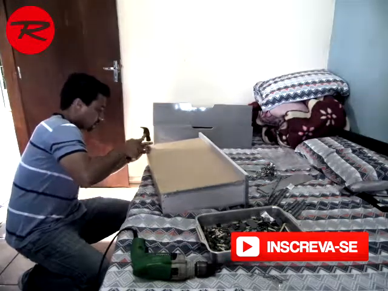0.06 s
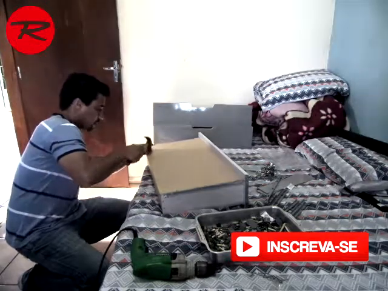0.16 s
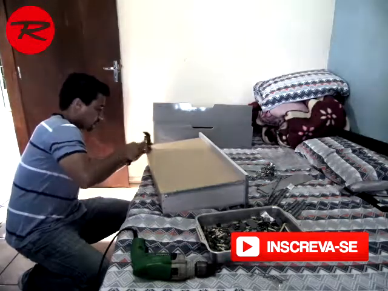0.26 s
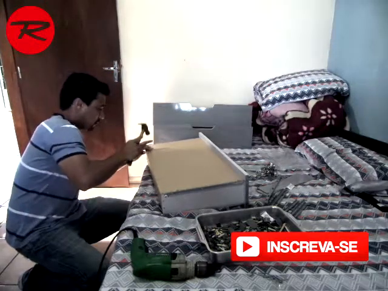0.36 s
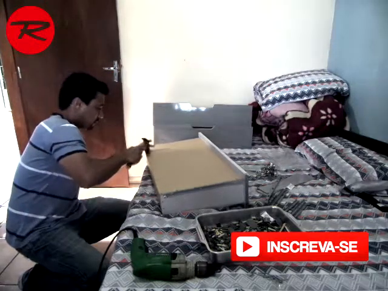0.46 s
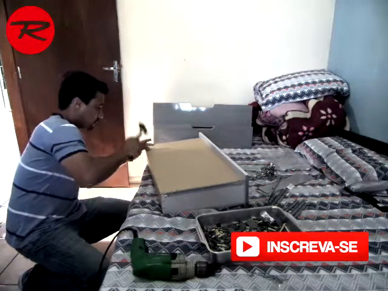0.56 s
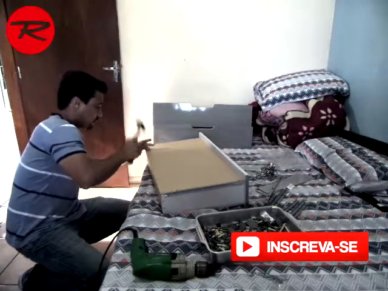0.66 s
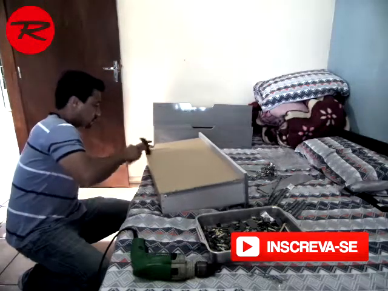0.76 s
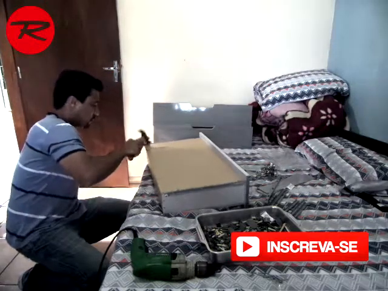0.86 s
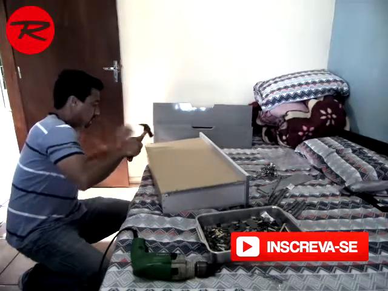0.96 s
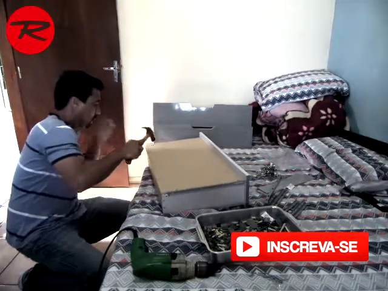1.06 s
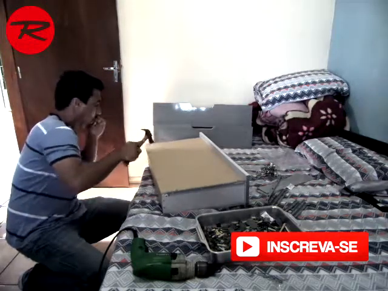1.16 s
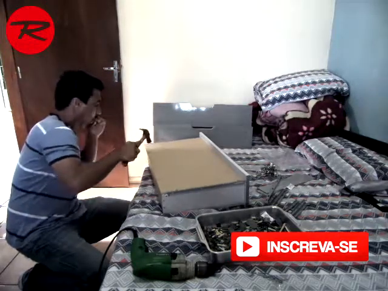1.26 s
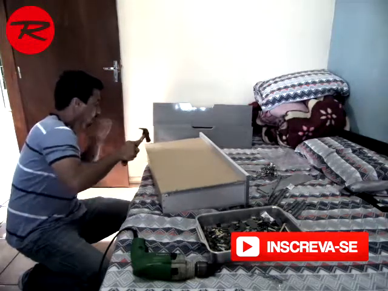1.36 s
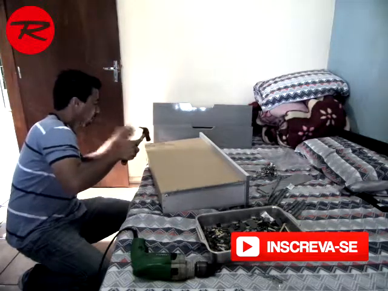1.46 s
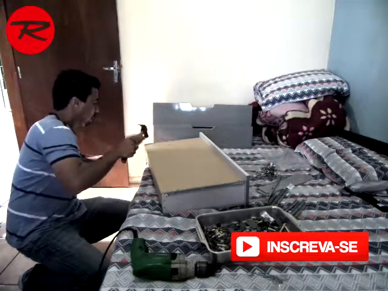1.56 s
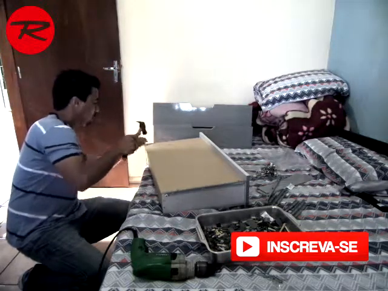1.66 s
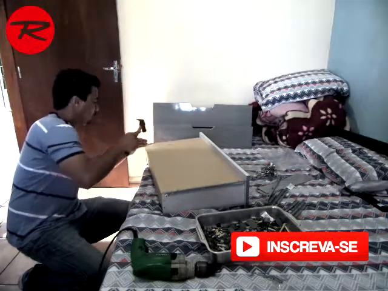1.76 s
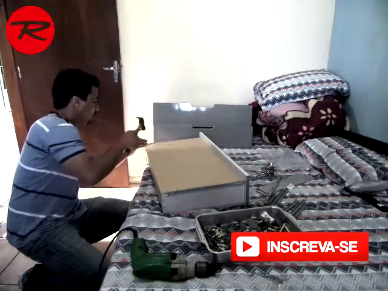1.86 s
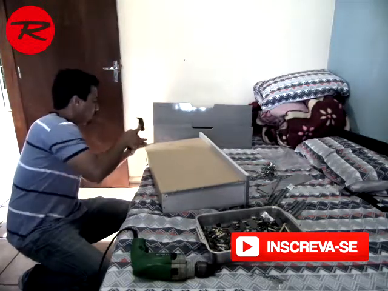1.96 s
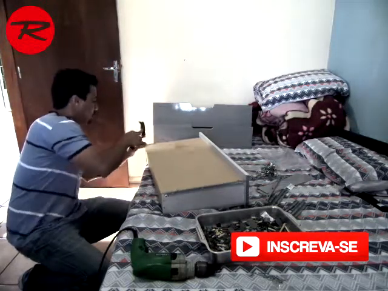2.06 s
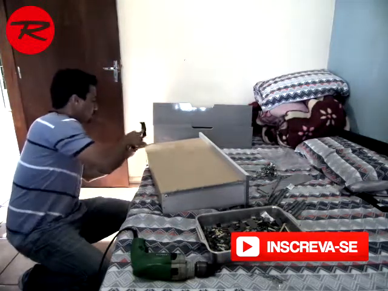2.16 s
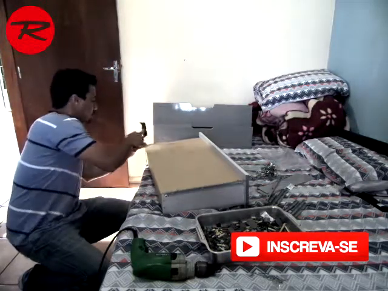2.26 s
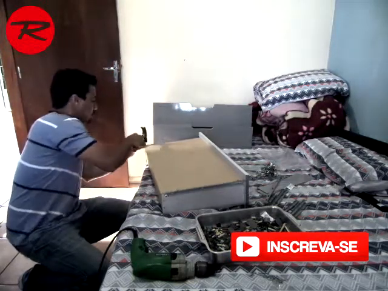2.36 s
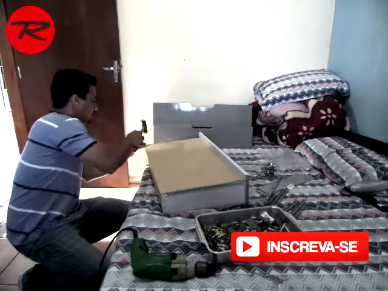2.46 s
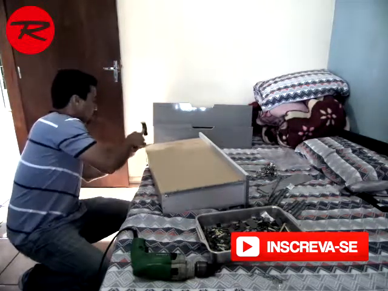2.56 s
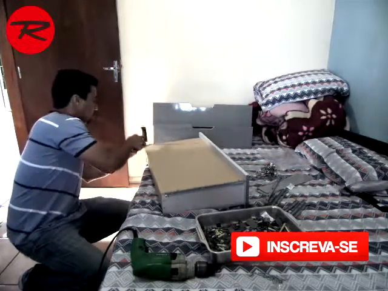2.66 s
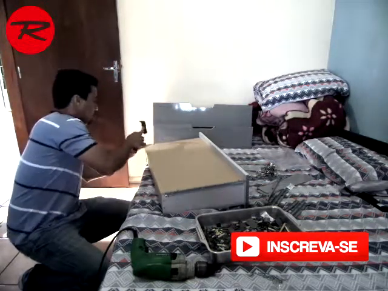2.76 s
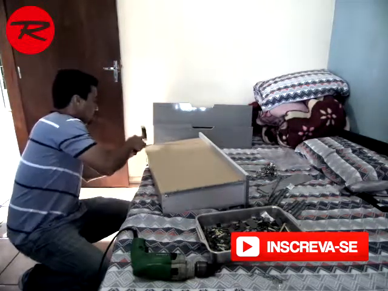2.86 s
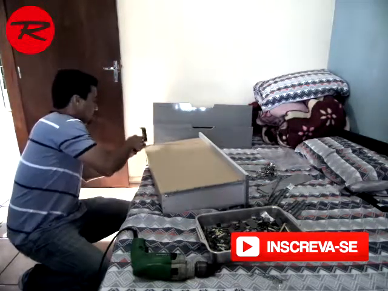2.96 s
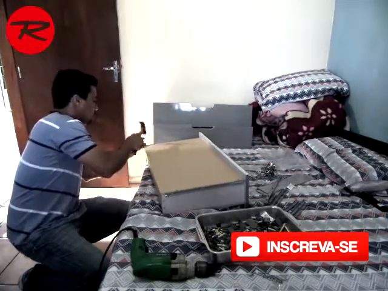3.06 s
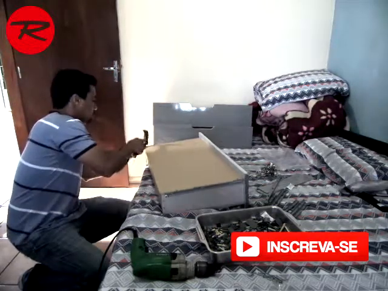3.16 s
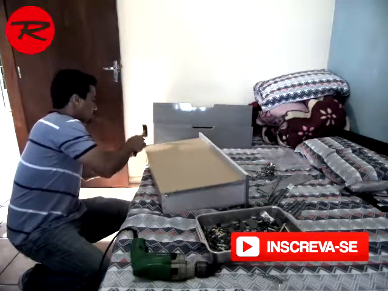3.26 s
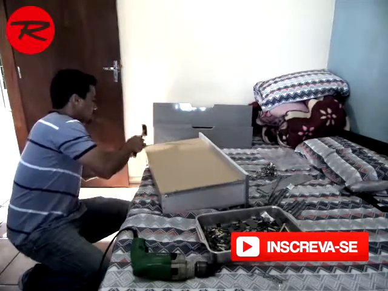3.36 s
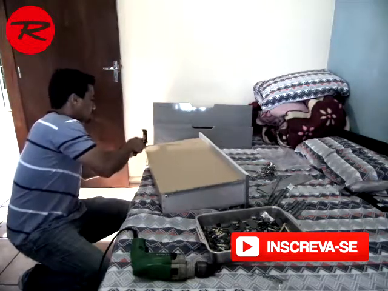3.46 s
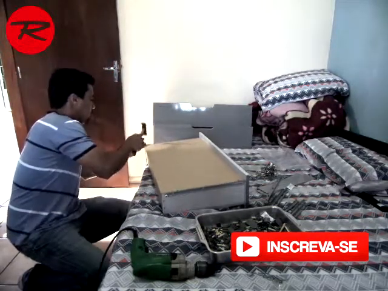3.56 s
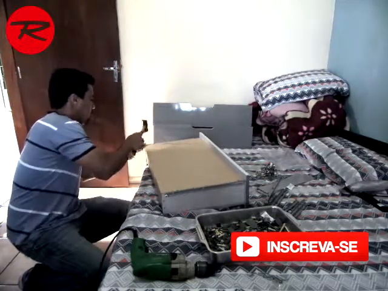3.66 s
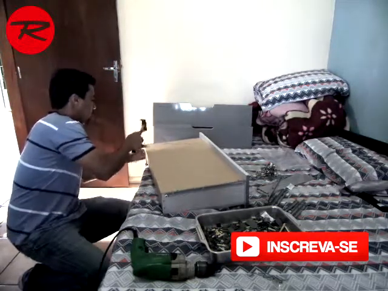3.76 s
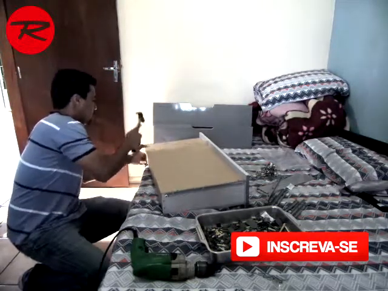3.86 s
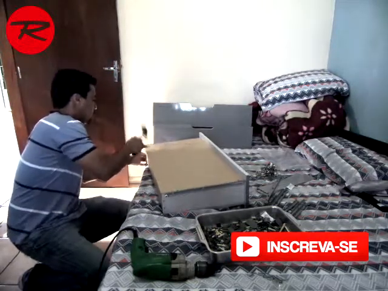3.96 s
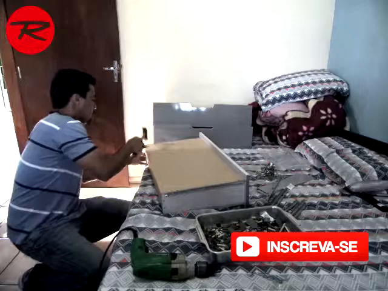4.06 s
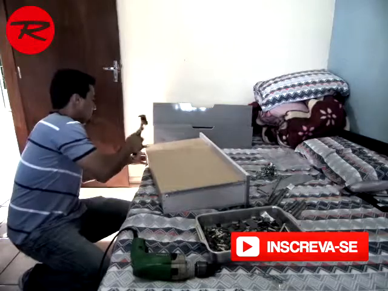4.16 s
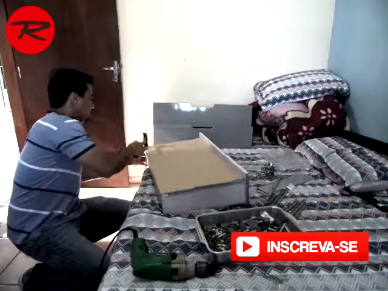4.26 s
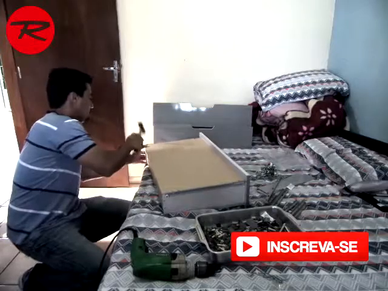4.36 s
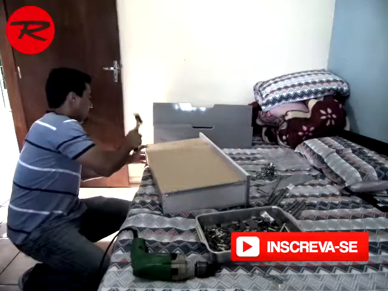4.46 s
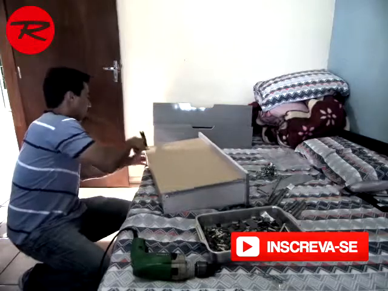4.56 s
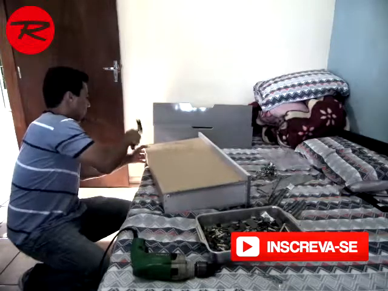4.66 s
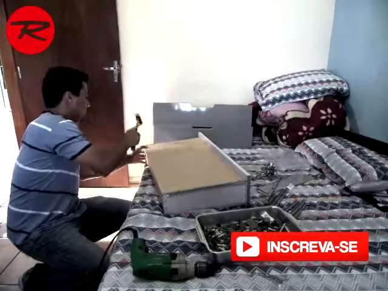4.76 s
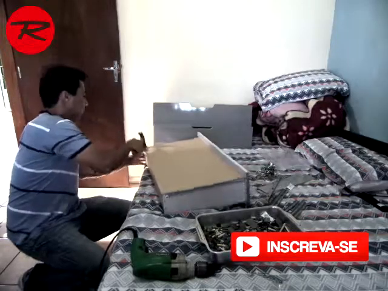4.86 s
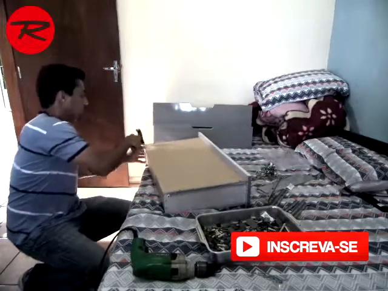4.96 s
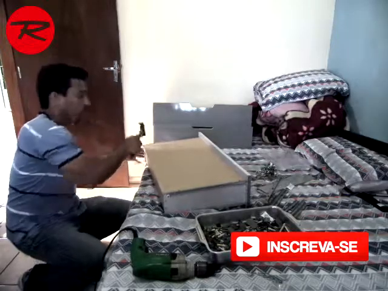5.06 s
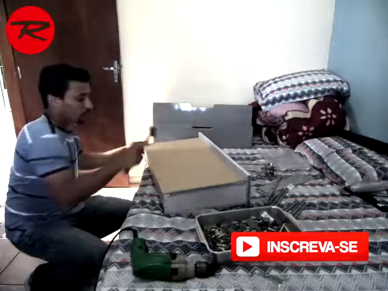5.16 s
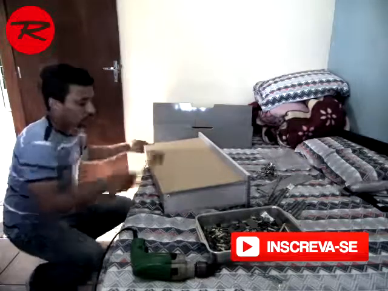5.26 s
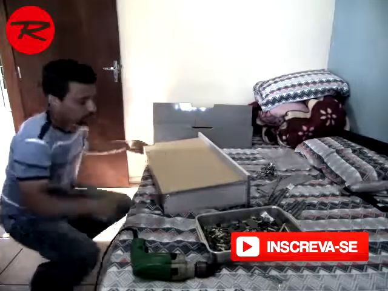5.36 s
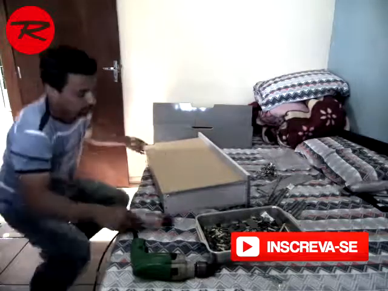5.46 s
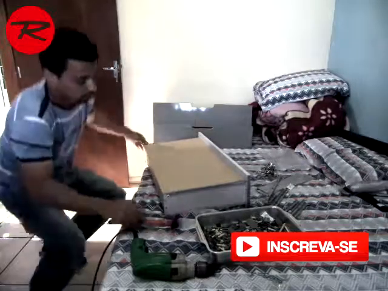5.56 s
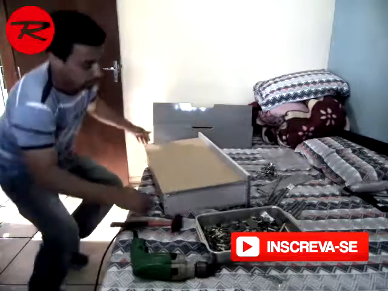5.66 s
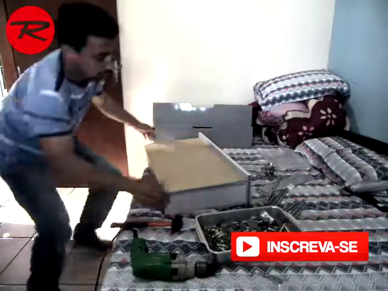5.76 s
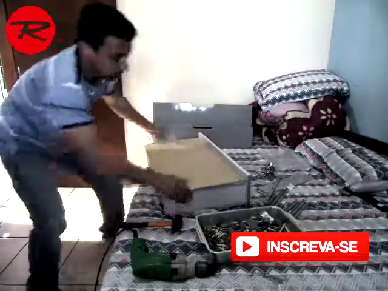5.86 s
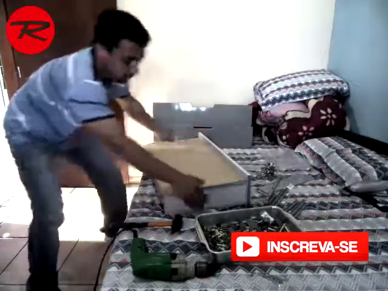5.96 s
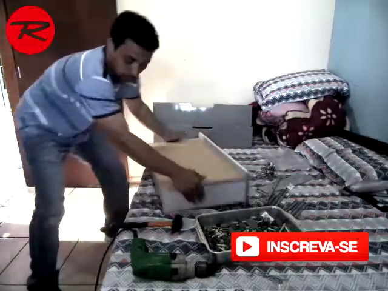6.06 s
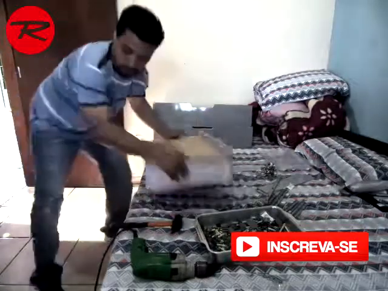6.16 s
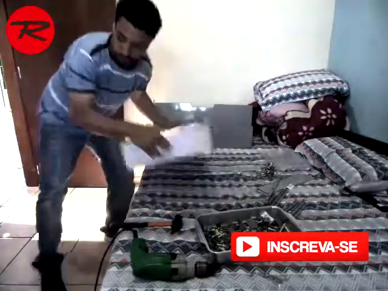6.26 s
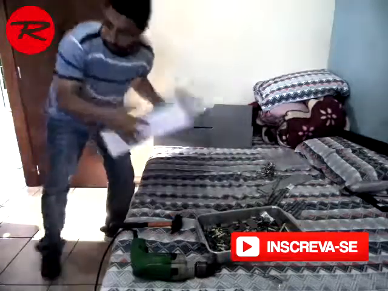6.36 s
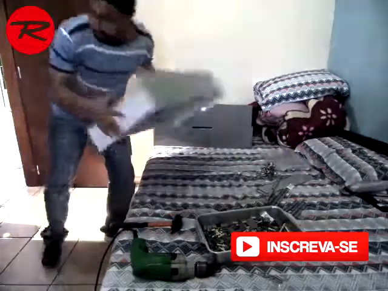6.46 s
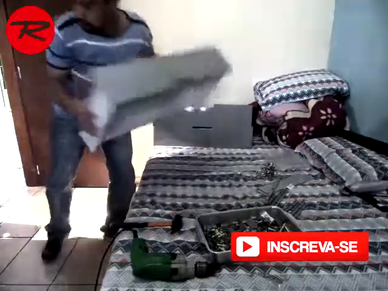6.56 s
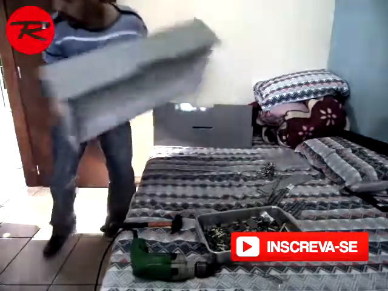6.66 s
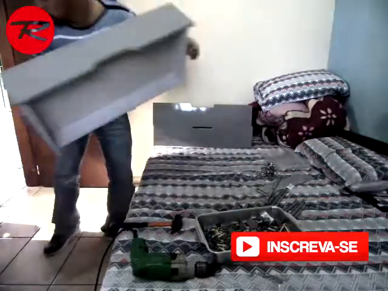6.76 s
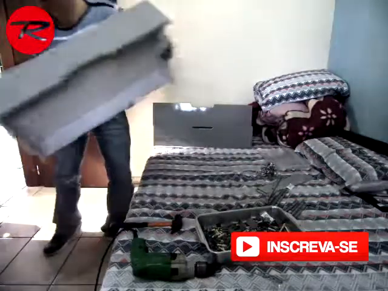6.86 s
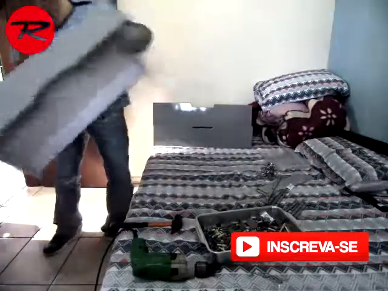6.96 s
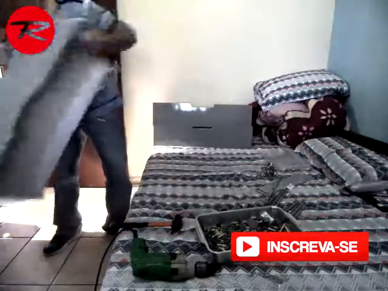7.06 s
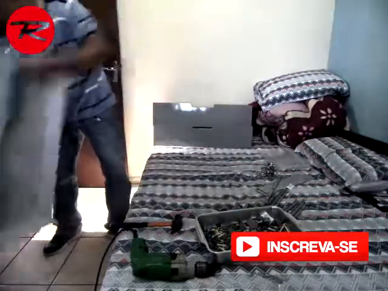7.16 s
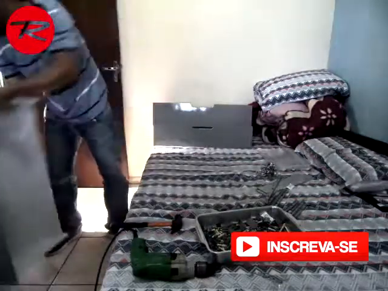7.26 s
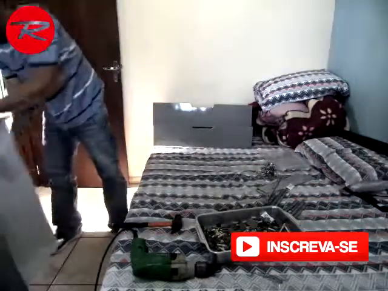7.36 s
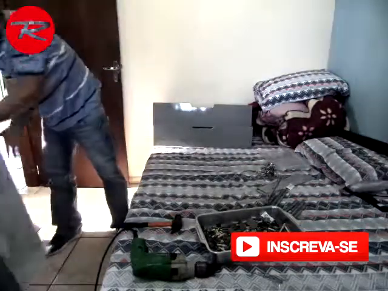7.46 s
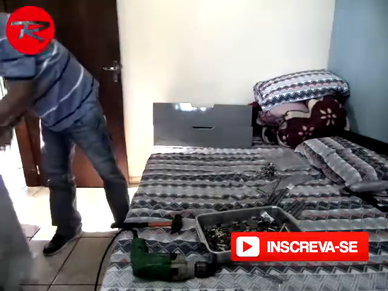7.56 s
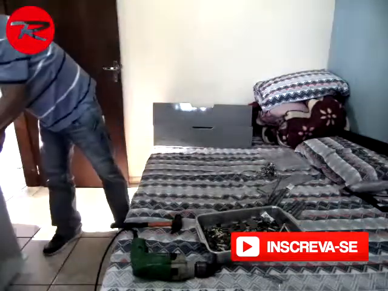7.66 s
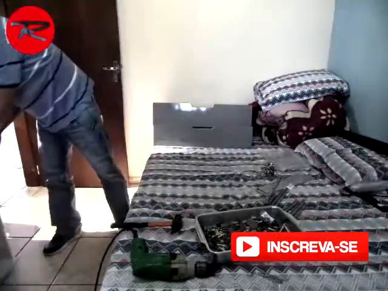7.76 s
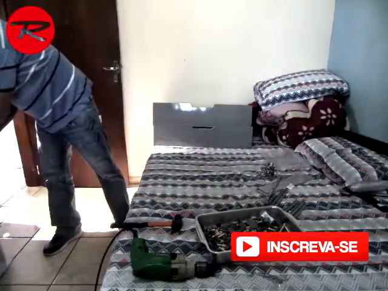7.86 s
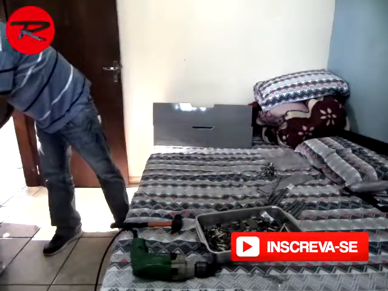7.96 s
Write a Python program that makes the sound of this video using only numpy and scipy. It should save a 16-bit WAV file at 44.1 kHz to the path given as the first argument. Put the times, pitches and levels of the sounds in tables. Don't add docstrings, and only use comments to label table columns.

```python
import sys
import numpy as np
from scipy import signal
from scipy.fft import rfft, irfft
from scipy.io import wavfile
from scipy.ndimage import uniform_filter1d

SR = 44100
rng = np.random.default_rng(int(sys.argv[2]) if len(sys.argv) > 2 else 0)


def nominal_scale(level):
    x = np.asarray(level, float) / 20
    return 10 ** x


def digitize_waveform(pressure):
    field = np.atleast_2d(pressure).T
    bounded = np.clip(field, -1, 1)
    quanta = np.round(bounded * 32767).astype(np.int16)
    wavfile.write(sys.argv[1], SR, quanta)


N = 352800

# start_s, level_db
OUTDOOR_LEVEL = [(0, -47.5), (1.0, -70), (2.2, -65), (3.5, -58), (4.0, -57), (5.0, -69), (6.06, -66.5),
                 (6.5, -64.5), (6.9, -61), (8, -56)]
# pitch_hz, level_db (per Hz)
RUMBLE_SPECTRUM = [(47, -40), (80, -15.5), (199, -2), (222, -15), (259, -1), (283, -14), (361, -12.5),
                   (493, -14.5), (588, -13.5), (672, -17.5), (751, -18), (1740, -25), (2180, -26.5),
                   (16000, -40.5)]
# start_s, pitch_hz, level_db
ENGINE = [(5.9, 140, -64), (6.4, 140, -65.5), (6.6, 140, -62.5), (7.0, 150, -57.5), (7.4, 158, -55.5),
          (7.8, 165, -59.5), (8, 165, -65)]
ENGINE_WANDER_HZ = 12
DEEP_DB, DEEP_FOLLOWS = -68.5, .65
LUMPY_DB, DEEP_LUMPY_DB = 1.5, 3

# full_contact_s, rise_s, hold_s, shuffle_db, hiss_db
CLOTH_CONTACTS = [(1.535, .03, .01, -83.5, -90.5), (1.71, .006, 0.0091, -69, -68),
                  (1.92, 0.11, 0.13, -84, -88), (3.628, 0.027, 0.014, -54, -61),
                  (3.848, 0.026, .01, -69, -80), (5.44, .04, .3, -86, -80), (5.846, 0.029, 0.035, -66, -64),
                  (6.06, 0.13, 0.098, -68.5, -70), (6.29, 0.088, 0.17, -68, -62),
                  (6.553, .05, 0.13, -75, -70.5), (6.739, 0.048, .01, -58, -57.5),
                  (6.8, .03, 0.012, -59, -63.5), (6.936, 0.05, 0.026, -68, -67),
                  (7.043, 0.068, 0.022, -55, -60), (7.125, 0.053, 0.016, -65, -60),
                  (7.347, 0.011, .02, -73, -61.5), (7.428, 0.059, 0.075, -68, -74),
                  (7.683, .02, .05, -69, -86)]
RUSTLE_FALL_S = .05

# peak_s, pitch_hz, level_db, fall_s, width_hz
RUBS = [(1.68, 750, -70, .1, 30), (1.72, 1450, -75, .05, 23), (6.302, 1620, -69.5, 0.039, 40),
        (6.463, 1610, -61.5, 0.043, 69), (6.733, 5400, -62.5, 0.073, 890), (6.81, 1620, -55.5, .04, 350),
        (6.81, 2370, -63, .04, 150), (6.9, 4370, -66, .02, 150), (7.1, 3120, -69, 0.062, 350),
        (7.12, 3400, -63.5, 0.07, 550), (1.25, 358, -70, 0.16, 10), (6.06, 290, -63, .03, 45),
        (7.05, 13500, -56, 0.044, 2900)]
RUB_RISE = 0.52
# pitch_hz, level_db, width_hz
NAIL_CLINK = [(2630, -69.5, 60), (3320, -64, 350), (3610, -68, 100), (6100, -67, 250), (4900, -71, 900)]
CLINK_S, CLINK_RISE_S, CLINK_FALL_S = 1.71, .006, .055

# pitch_hz, t60_s
ROOM_T60 = [(60, 1), (150, 0.41), (500, 0.41), (2000, 0.42), (5000, 0.38), (8000, 0.35), (13000, 0.27)]
ROOM_BUILD_S = 0.0036
# pitch_hz, level_db
COLOUR = [(40, -24.5), (100, -24), (140, 5.5), (250, 7.5), (500, 5), (1000, 5), (2000, 2), (3300, -1),
          (4500, -5), (8000, -8.5), (10000, -8.5), (12000, -3.5), (15500, -9), (16000, -10)]

# pitch_hz, level_db, t60_s
DRAWER_MODES = [(150, -20.5, 0.22), (183, -16.5, .12), (258.7, -4, 0.18), (408, -6.5, 0.18),
                (518, -2.5, 0.14), (587, -9.5, 0.26), (639, -9.5, 0.3), (825, -18, .18), (910, -24, 0.24),
                (1322, -17.5, 0.19)]
# pitch_hz, level_db, t60_s
FAR_EDGE_MODES = [(138, -35.5, .5), (205, -31, .15)]
# pitch_hz, level_db
TILE_THUD = [(135, -12), (200, -20), (550, -14), (850, -22.5), (1100, -23.5), (3200, -29), (3600, -36),
             (5000, -32.5)]
SET_DOWN_S, REBOUND_S = 7.787, 7.897
DRAWER_DB, DRAWER_RISE_S = -10.5, 0.0012

# start_s, box_db, panel_db, snap_db, steel_db
BLOWS = [(0.106, -17, -18, -26.5, -16), (0.409, -23.5, -16.5, -28.5, -14.5),
         (0.686, -23.5, -23, -22.5, -17.5), (2.306, -30.5, -29, -45, -50.5),
         (2.596, -28, -28.5, -47.5, -48.5), (2.864, -24, -18.5, -26.5, -28), (3.11, -24, -16.5, -24.5, -25),
         (3.383, -20.5, -16.5, -23.5, -22), (3.965, -16.5, -16, -29.5, -19),
         (4.228, -16, -17, -28.5, -20.5), (4.502, -22, -20.5, -23.5, -17), (4.802, -26, -21.5, -22.5, -18)]
# start_s, box_db, panel_db, snap_db, steel_db
EARLIER_BLOW = [(-.17, -10.5, -14, -25.5, -12.5)]
# start_s, panel_db, knock_db, snap_db, steel_db
BUMPS = [(1.701, -64, -85, -81, -80), (5.972, -46, -67, -92, -80), (6.705, -58, -55, -70, -62),
         (6.753, -40, -40.5, -71, -62), (7.337, -48, -51.5, -74, -57), (7.896, -42, -69, -36, -33)]
PART_HZ = [150, 270, 600, 2500, 13000]
KNOCK_FROM_SNAP, KNOCK_DB = 0.55, 3
SOFTEST_SNAP_DB = -10
BUMP_BOX_DB = -8.5

# pitch_hz, level_db, t60_s
PANEL_MODES = [(145.6, -8.5, 0.42), (168.4, -4.5, 0.26), (204.7, 1.5, 0.29), (246.6, -3.5, 0.38),
               (274, -4, 0.38), (327, -14, 0.05), (379, -15.5, 0.12), (456.3, -5.5, 0.67),
               (512, -11.5, 0.22), (608.3, -8.5, 0.36), (661.6, -15, 0.68)]
MAIN_MODES = [1, 2, 3, 4, 7]
# level_db, one per main mode
MAIN_MODE_DB = [-1, 0.97, -0.85, 1, 1]
# db_per_db, one per main mode
MAIN_MODE_PER_SEATING = [0.23, 0.45, -0.022, -.2, 0.061]
MEAN_SEATING_DB, SPOT_SCATTER = -8, .25
GIVE_S = 0.0042
# pitch_hz, level_db (under panel and knock), t60_s, swell_s
MATTRESS = (55, -23, .45, .04)

CRACK_DB, CRACK_S, CRACK_PER_STEEL = -8.5, 0.0022, 0.78
SECOND_CONTACT_S, SECOND_CONTACT_DB = 0.0058, 0.67
SEAT_CLICK_S, SEAT_CLICK_DB = .00015, 9.5
RIPPLE_DB, RIPPLE_HZ = 2.3, 90
KNOCK_SIZE, LEAD_IN = 32768, 1024

HUSH_GRID_S, HUSH_START = 1024 / 44100, .22
HUSH_END_S = .003
HUSH_FROM_DB, TREBLE_HUSH_FROM_DB = -19.5, -27
HUSH_PER_DB, HUSH_DB, HUSH_SPLIT_HZ = 16.5, 36, 2300
CAPSULE_BEND, TOP_CUT_HZ = .22, 16950


def at_hz(points, hz):
    p = np.array(points, float)
    return np.interp(np.log(np.maximum(hz, 1)), np.log(p[:, 0]), p[:, 1])


def rms_one(x):
    return x / np.sqrt(np.mean(x ** 2) + 1e-20)


def along(rows, column, quiet=-120):
    p = np.array(rows, float)
    return np.interp(np.arange(N) / SR, p[:, 0], p[:, column], left=quiet, right=quiet)


def band(x, low_hz, high_hz):
    edges_hz = [low_hz, min(high_hz, .49 * SR)]
    return signal.sosfilt(signal.butter(2, edges_hz, "band", fs=SR, output="sos"), x)


def drift(rate):
    knots = rng.standard_normal(int(N / SR * 60) + 2)
    return np.interp(np.arange(N) / SR * min(rate, 59), np.arange(len(knots)), knots)


def ambience():
    hz = np.arange(N // 2 + 1) * SR / N
    spectrum = nominal_scale(at_hz(RUMBLE_SPECTRUM, hz)) * (hz > 85)
    rumble = irfft(rfft(rng.standard_normal(N)) * spectrum, N)
    rumble /= np.std(band(rumble, 100, 600))
    level_db = along(OUTDOOR_LEVEL, column=1, quiet=-65)
    deep_db = DEEP_DB + DEEP_FOLLOWS * (level_db + 66.5) + DEEP_LUMPY_DB * drift(11)
    deep = rms_one(band(rng.standard_normal(N), 29, 60)) * nominal_scale(deep_db)
    engine_hz = along(ENGINE, column=1, quiet=140) + ENGINE_WANDER_HZ * drift(25)
    engine_db = along(ENGINE, column=2) + 2.1 * drift(25)
    engine = nominal_scale(engine_db) * np.sin(2 * np.pi * np.cumsum(engine_hz) / SR)
    return nominal_scale(level_db + LUMPY_DB * drift(8)) * rumble + engine + deep


def rustle():
    grain_db = 1.7 * drift(50) + 2.5 * rng.exponential(1, N // 8).repeat(8)
    shuffle = rms_one(band(rng.standard_normal(N) * nominal_scale(grain_db), 330, 4200))
    hiss = rms_one(band(rng.standard_normal(N) * nominal_scale(1.5 * drift(40)), 4500, 21000))
    t, power = np.arange(N) / SR, np.zeros((2, N))
    for s, rise, hold, *levels_db in CLOTH_CONTACTS:
        swell = (np.maximum(s - t, 0) / rise) ** 2
        fall = np.maximum(t - s - hold, 0) / RUSTLE_FALL_S
        power += (nominal_scale(np.array(levels_db))[:, None] * np.exp(-swell - fall)) ** 2
    return np.sqrt(power[0]) * shuffle + np.sqrt(power[1]) * hiss


def squeaks():
    out, t = np.zeros(N), np.arange(-SR // 4, SR // 2) / SR
    notes = [(s, f, db, RUB_RISE * fall, fall, width) for s, f, db, fall, width in RUBS]
    notes += [(CLINK_S, f, db, CLINK_RISE_S, CLINK_FALL_S, width) for f, db, width in NAIL_CLINK]
    for s, f, db, rise, fall, width in notes:
        half_width = max(width, f / 60) / 2
        note = rms_one(band(rng.standard_normal(len(t)), f - half_width, f + half_width))
        shape = np.where(t < 0, np.exp(-(t / rise) ** 2), np.exp(-np.abs(t) / fall))
        i = round(s * SR) - SR // 4
        out[i:i + len(t)] += nominal_scale(db) * shape * note
    return out


def drawer_ring(s, modes, extra_db):
    age = np.maximum(np.arange(N) / SR - s, 0)
    rings = np.zeros(N)
    for f, db, t60 in modes:
        fading = nominal_scale(db + extra_db - 60 * age / min(t60, .5))
        rings += fading * np.sin(2 * np.pi * f * age + rng.uniform(0, 2 * np.pi))
    return rings * (1 - np.exp(-age / DRAWER_RISE_S)) ** 2


def bedroom(size):
    t, edges = np.arange(size) / SR, 40 * 2 ** np.arange(0, 9.1, .5)
    white = rng.standard_normal((2, 2 * size))
    pairs = zip(edges, edges[1:])
    bands = np.array([band(white[k % 2], low, high) for k, (low, high) in enumerate(pairs)])
    t60 = at_hz(ROOM_T60, np.sqrt(edges[1:] * edges[:-1]))[:, None]
    return bands, nominal_scale(-60 * t / t60) * (1 - np.exp(-t / ROOM_BUILD_S)) * (t < .65)


def steel_crack(t, level_db):
    spike_db = 5 * rng.standard_normal(len(t) // 16).repeat(16)
    spikes = rng.standard_normal(len(t)) * nominal_scale(spike_db)
    click = np.roll(spikes[::-1] * np.exp(-t / SEAT_CLICK_S), round(SECOND_CONTACT_S * SR))
    click *= nominal_scale(SECOND_CONTACT_DB + SEAT_CLICK_DB)
    burst = spikes * (t / CRACK_S * np.exp(1 - t / CRACK_S)) ** 2
    return nominal_scale(level_db) * np.diff(burst + click, n=2, prepend=[0, 0])


def panel_ring(age, modes, weight, levels_db, longest_s):
    extra_db = rng.normal(0, 3.8, len(PANEL_MODES))
    seating_db = np.clip(levels_db[3] - levels_db[1] - MEAN_SEATING_DB, -11, 11)
    shift_db = MAIN_MODE_DB + seating_db * np.array(MAIN_MODE_PER_SEATING)
    extra_db[MAIN_MODES] = SPOT_SCATTER * extra_db[MAIN_MODES] + shift_db
    rings = np.zeros(len(age))
    for (f, db, t60), more_db in zip(modes, extra_db):
        fading = nominal_scale(at_hz(weight, f) + db + more_db - 60 * age / min(t60, longest_s))
        rings += fading * np.sin(2 * np.pi * f * age + rng.uniform(0, 2 * np.pi))
    return rings * (1 - np.exp(-age / 0.0087)) ** 2


def mattress_thump(age, level_db):
    hz, under_db, t60, swell = MATTRESS
    fading = nominal_scale(level_db + under_db - 60 * age / t60)
    return fading * np.sin(2 * np.pi * hz * age) * (1 - np.exp(-age / swell))


def knocks(events, part_hz, top_db, longest_s, crack_db, modes=PANEL_MODES):
    size = KNOCK_SIZE
    t, hz = np.arange(size) / SR, np.arange(size // 2 + 1) * SR / size
    out = np.zeros(N + 2 * size)
    bands, fades = bedroom(size)
    age = np.maximum(t - LEAD_IN / SR + GIVE_S, 0)
    for s, *levels_db in events:
        weight = list(zip(part_hz, levels_db)) + [(16500, levels_db[-1] + top_db)]
        shift = rng.integers(size)
        room = np.sum(bands[:, shift:shift + size] * fades, axis=0)
        brightness_db = np.clip(levels_db[-1] - levels_db[-2], -10, 12)
        crack = steel_crack(t, crack_db + CRACK_PER_STEEL * brightness_db)
        ripple_db = RIPPLE_DB * np.interp(hz / RIPPLE_HZ, np.arange(400), rng.standard_normal(400))
        colour = nominal_scale(at_hz(weight, hz) + at_hz(COLOUR, hz) + ripple_db)
        sound = 2.493 * irfft(rfft(np.roll(room + crack, LEAD_IN)) * colour)
        sound *= np.clip(age / 0.0025, 0, 1) ** 2 * (t < .68)
        sound += panel_ring(age, modes, weight, levels_db, longest_s)
        sound += mattress_thump(age, max(levels_db[1:3]))
        i = round(s * SR) + size - LEAD_IN
        out[i:i + size] += sound
    return out[size:size + N]


def hammering():
    blows = []
    for s, box, panel, snap, steel in EARLIER_BLOW + BLOWS:
        knock = box + KNOCK_FROM_SNAP * max(snap - box, SOFTEST_SNAP_DB) + KNOCK_DB
        blows.append((s, box, panel, knock, snap, steel))
    return knocks(blows, PART_HZ, top_db=1.0, longest_s=0.38, crack_db=CRACK_DB)


def light_bumps():
    bumps = [(s, panel + BUMP_BOX_DB, panel, *rest) for s, panel, *rest in BUMPS]
    return knocks(bumps, PART_HZ, top_db=-13.0, longest_s=0.27, crack_db=-17)


def set_down():
    hz, db = np.transpose(TILE_THUD)
    thud = knocks([(SET_DOWN_S, *db)], hz, top_db=-13.0, longest_s=0.18, crack_db=-9, modes=[])
    landing = drawer_ring(SET_DOWN_S, DRAWER_MODES, DRAWER_DB)
    return thud + landing + drawer_ring(REBOUND_S, FAR_EDGE_MODES, 0)


def scene():
    background = ambience() + rustle() + squeaks()
    return (background + set_down() + light_bumps() + hammering())[None]


def hush_before_blows(x):
    t, gap_db = np.arange(N) / SR, np.zeros((2, N))
    for s, *_, steel_db in BLOWS:
        opens = (np.floor(s / HUSH_GRID_S - HUSH_START) + HUSH_START) * HUSH_GRID_S
        excess_db = steel_db - np.array([[HUSH_FROM_DB], [TREBLE_HUSH_FROM_DB]])
        hushed = (t > opens) & (t < s - HUSH_END_S)
        gap_db -= hushed * np.clip(HUSH_PER_DB * excess_db, 0, HUSH_DB)
    low = signal.sosfiltfilt(signal.butter(6, HUSH_SPLIT_HZ, fs=SR, output="sos"), x)
    low_gain, high_gain = nominal_scale(uniform_filter1d(gap_db, size=60))
    return low_gain * low + high_gain * (x - low)


def top_cut(x):
    return signal.sosfilt(signal.butter(12, 16970, fs=SR, output="sos"), x)


def record(dry):
    x = hush_before_blows(dry)
    x = x + CAPSULE_BEND * signal.lfilter([1, -1], [1, -.998], x ** 2)
    x = .7 * np.tanh(x / .7)
    x = signal.sosfilt(signal.cheby2(10, 60, TOP_CUT_HZ, fs=SR, output="sos"), x)
    return top_cut(x)


dry = scene()
out = record(dry)
digitize_waveform(out)
```